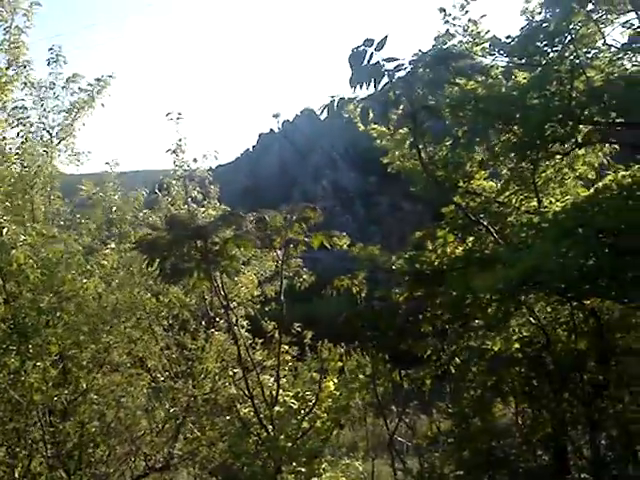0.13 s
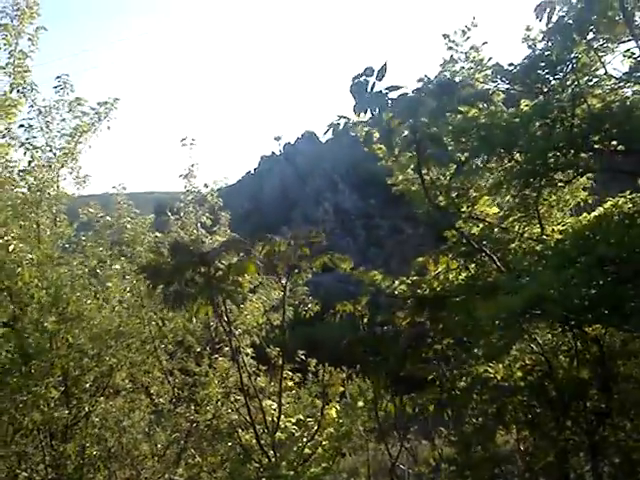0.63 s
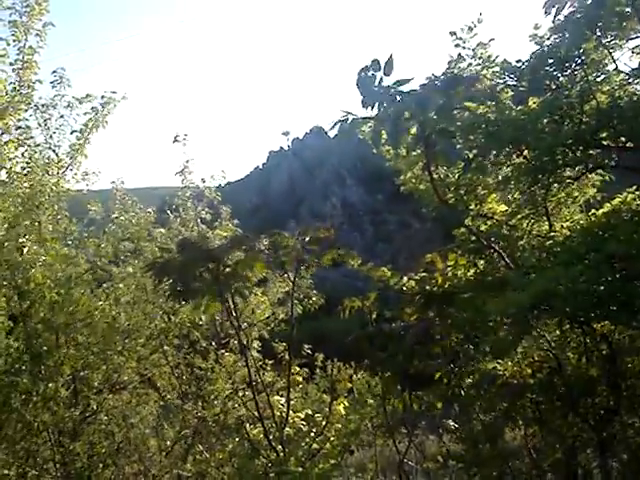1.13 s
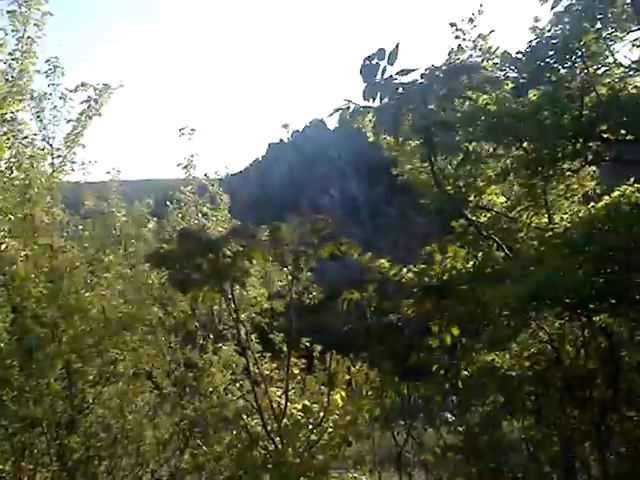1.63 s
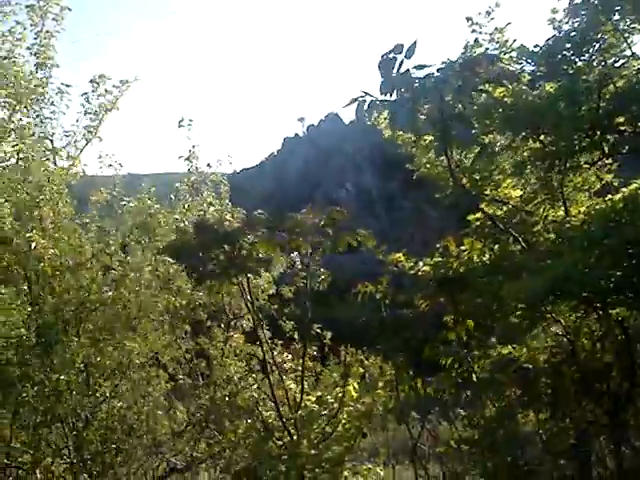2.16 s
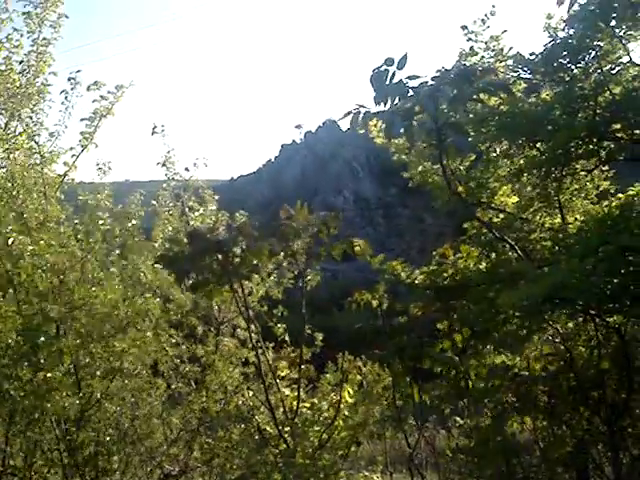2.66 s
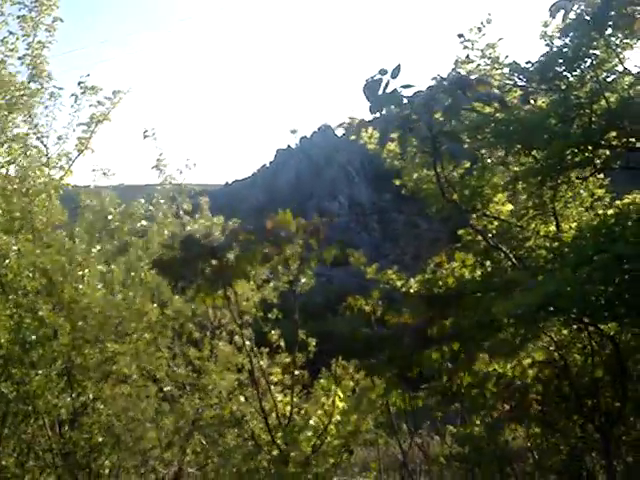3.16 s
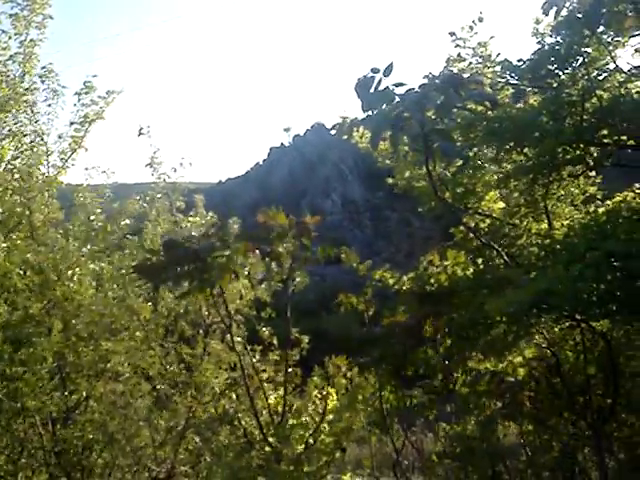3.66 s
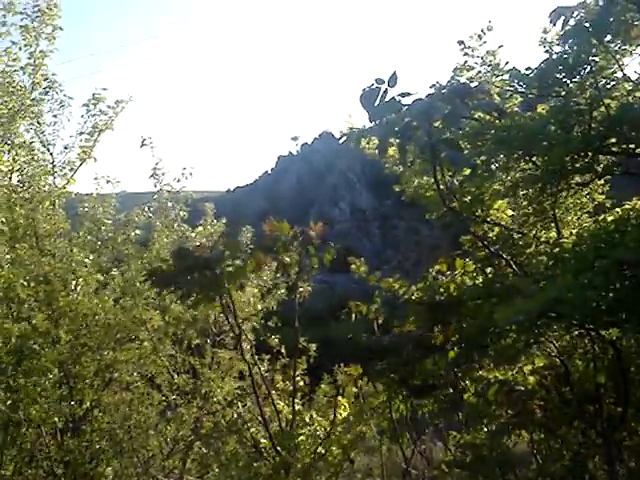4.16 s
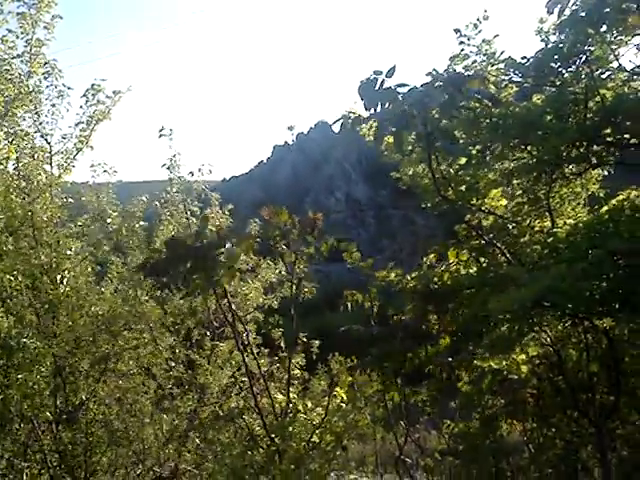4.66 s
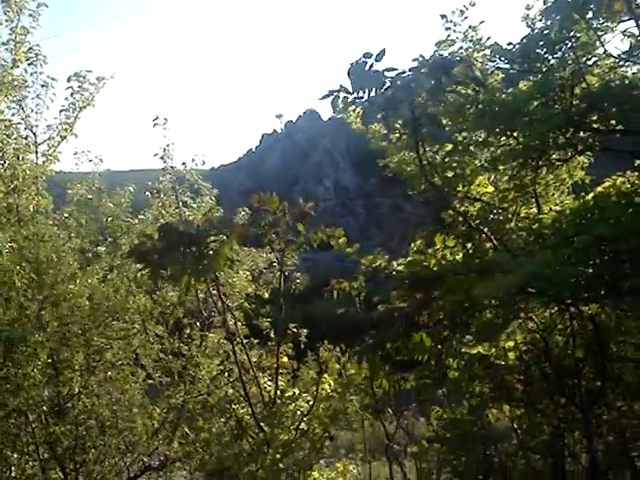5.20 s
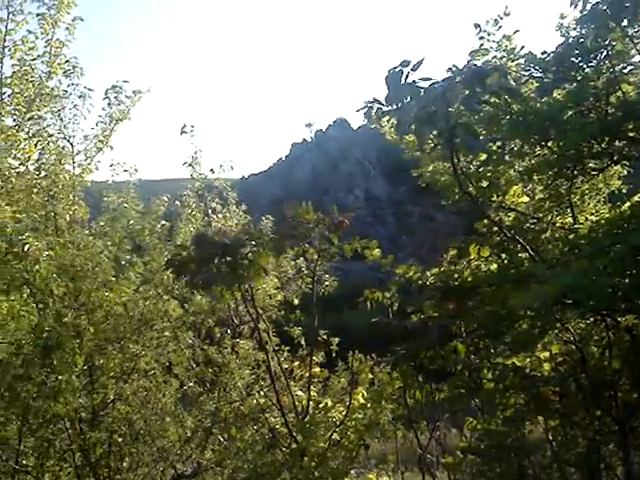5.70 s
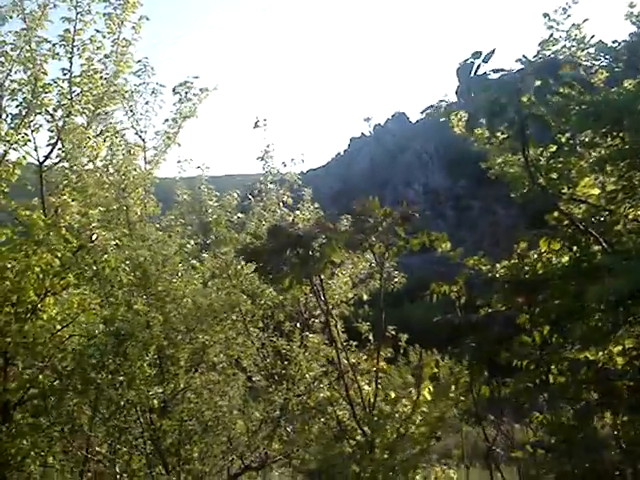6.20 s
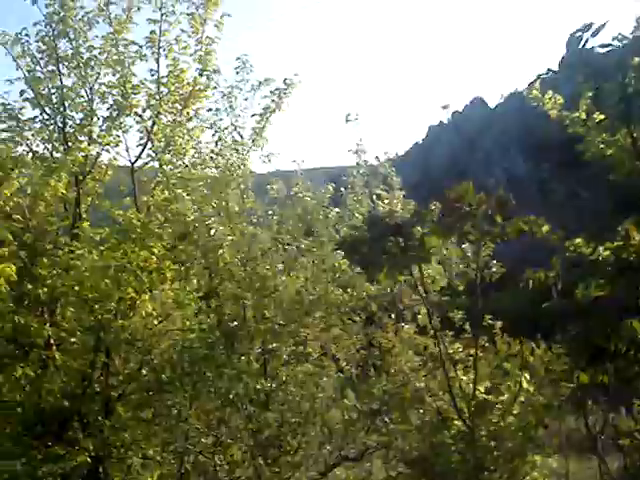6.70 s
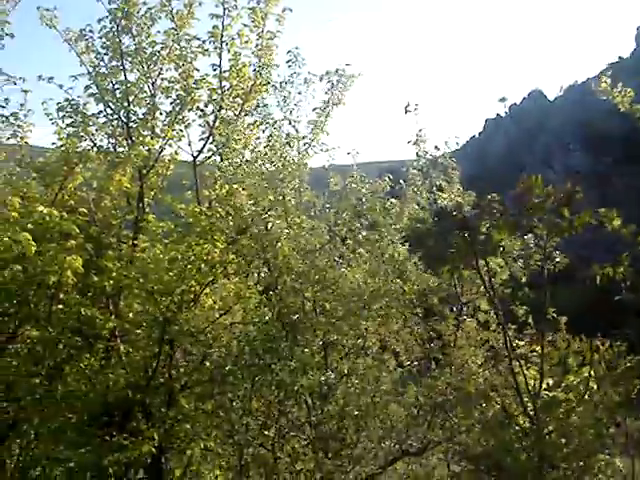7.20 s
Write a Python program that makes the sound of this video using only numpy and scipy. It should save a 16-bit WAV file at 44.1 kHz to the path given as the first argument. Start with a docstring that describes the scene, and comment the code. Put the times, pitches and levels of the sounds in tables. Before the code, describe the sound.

A quiet bushy valley, heard through one microphone with slightly dull treble and a faint airy hiss. Crickets chirp softly throughout in quick groups of four falling pulses near 4.5 kHz. At about 0.1, 0.4 and 0.7 s a near bird whistles a clear falling note, each preceded by a tiny high buzz; a lower dipping note follows at 0.9 and a fast hoarse downward trill at 1.1. From 1.2 to 4.3 s only faint distant whistles and twitters remain, blurred by echo, with dry close ticks at 2.1 and 2.3. More ticks come at 4.5, 5.0 and 6.3. Wind thumps softly at 3.7, then more densely from 4.2 to 5.8 and near 6.2. Short near peeps and slides sound at 4.8-5.2, a slower rising trill at 5.3-5.75, low chups at 5.9-6.2, then a quick bright jumble at 6.4-6.8, ending with faint far notes and crickets.

```python
"""Songbirds and crickets in a valley

Birds among bushes whistle in sines on bent pitch curves; trills and buzzes repeat one short sweep.
Crickets chirp in groups of four falling pulses, and dry ticks ring close to the microphone.
Echoes from leaves and slopes smear the notes, most of all the trills in the thicket, then the distant whistles.
Over faint shaped noise, later gusts thump on the single microphone as bursts of low swings."""
import sys
import numpy as np
from scipy import signal
from scipy.io import wavfile
from scipy.ndimage import uniform_filter1d

SR = 44100
rng = np.random.default_rng(int(sys.argv[2]) if len(sys.argv) > 2 else 0)


def wav_out(sig):
    """Save sig, one row per channel (or a flat mono array), as 16-bit PCM at SR to the path in sys.argv[1]."""
    wavfile.write(sys.argv[1], SR, np.round(np.clip(np.atleast_2d(sig).T, -1, 1) * 32767).astype(np.int16))


def gain_from_decibels(decibels):
    """Convert decibel values to linear amplitude factors."""
    exponent = np.asarray(decibels, float) / 20
    return 10 ** exponent


N = 323253  # samples


def evened(x):
    """Scales to rms 1."""
    return x / np.sqrt(np.mean(x ** 2) + 1e-20)


def add(mix, s, sound):
    """Mixes a sound in from time s."""
    part = mix[max(round(s * SR), 0):][:len(sound)]
    part += sound[:len(part)]


def sweep(hz, level, octave=0):
    """A sine that follows a pitch curve, with a share of its octave."""
    phase = 2 * np.pi * np.cumsum(hz) / SR
    return level * (np.sin(phase) + octave * np.sin(2 * phase))


def flutter(n, size):
    """Random wavering of rms 1, smooth over size samples."""
    smooth = uniform_filter1d(rng.standard_normal(n), size)
    return evened(uniform_filter1d(smooth, size))


def noise(points, patchy_db):
    """Random short-time spectra of a given colour, with drifting patches; rms 1."""
    hz = np.fft.rfftfreq(2048, 1 / SR)
    real, imag, patches = rng.standard_normal((N // 512 + 5, len(hz), 3)).T
    patches = uniform_filter1d(patches, size=5, axis=1)  # over time
    patches = evened(uniform_filter1d(patches, size=20, axis=0))  # over frequency
    point_hz, point_db = np.transpose(points)
    colour_db = np.interp(np.log(hz + 1), np.log(point_hz + 1), point_db)[:, None]
    spectra = (real + 1j * imag) * gain_from_decibels(colour_db + patchy_db * patches)
    return evened(signal.istft(spectra, nperseg=2048, noverlap=1536)[1][:N])


# colour of the air around the microphone: (frequency [Hz], relative density [dB per Hz])
AIR_COLOUR = [(35, -43), (60, -17), (175, -3.5), (466, -4.5), (1250, -11), (3620, -15.5), (4580, -15),
              (10500, -27)]


def air():
    """The faint bed of the place: noise strongest in the low mids, a little patchy."""
    return gain_from_decibels(-52) * noise(AIR_COLOUR, patchy_db=1.4)  # rms in dB


# eddies that hit the microphone: (time of the middle [s], swing rate [Hz], envelope peak [dB])
EDDIES = [(3.661, 154, -26.5), (4.217, 77, -31.5), (4.391, 97, -32), (4.538, 94.5, -33), (4.902, 191, -24),
          (5.082, 75, -31), (5.212, 119, -27), (5.241, 92, -26), (5.272, 132, -24), (5.299, 139, -21.5),
          (5.517, 86.6, -31.5), (5.625, 111, -25.5), (5.641, 76.4, -26), (5.766, 92, -26),
          (6.141, 153, -30), (6.258, 125, -31)]
# rumble at the microphone between the gusts: (time [s], rms level [dB])
WIND_LEVEL = [(0, -69), (2.4, -69.5), (3.5, -61.5), (4.3, -44), (6, -46), (6.7, -51.5), (7.33, -48.5)]
# colour of that rumble: (frequency [Hz], relative density [dB per Hz])
RUMBLE_COLOUR = [(15, -12), (70, -0.5), (150, -11.5), (600, -56.5)]


def wind():
    """Single eddies push the membrane for a cycle or two; a lumpy rumble swells around them."""
    out, gusts = np.zeros(N), np.zeros(N)
    for (s, hz, db), phase in zip(EDDIES, rng.random(len(EDDIES))):
        cycle = np.arange(-2, 2, hz / SR)
        bent = cycle + 0.082 * np.sin(2 * np.pi * cycle)  # uneven swings put some power higher up
        envelope = gain_from_decibels(db) * np.exp(-(cycle / 0.73) ** 2)
        add(out, s - 2 / hz, envelope * np.cos(2 * np.pi * (bent + phase)))
        add(gusts, s - .06, gain_from_decibels(db - 21) * np.hanning(round(.15 * SR)))
    s, db = np.transpose(WIND_LEVEL)
    between = gain_from_decibels(np.interp(np.arange(N) / SR, s, db))
    return out + noise(RUMBLE_COLOUR, patchy_db=3.5) * (gusts + between)


# dry ticks close to the microphone: (time [s], level before crackle and ring shape it [dB])
TICK_TIMES = [(2.0604, -36.5), (2.312, -37.5), (4.5318, -34.5), (5.012, -38.5), (6.326, -40)]
# ringing of a tick: (frequency [Hz], relative level [dB], time to fall by 60 dB [s])
TICK_MODES = [(1484, -4.5, 0.023), (3800, 3, 0.0084), (6550, 5.5, 0.0015), (8700, -1, .0015)]


def ticks():
    """A ragged crackle of two milliseconds that rings for a few milliseconds."""
    out, t = np.zeros(N), np.arange(1000) / SR
    ring = sum(gain_from_decibels(db - 60 * t / t60) * np.sin(2 * np.pi * hz * t) for hz, db, t60 in TICK_MODES)
    crackles = rng.standard_normal((len(TICK_TIMES), 100)) ** 3  # the cube makes it ragged
    for (s, db), crackle in zip(TICK_TIMES, crackles):
        crackle = crackle * np.hanning(len(crackle) * 2)[len(crackle):]  # fades out
        add(out, s, gain_from_decibels(db) * np.convolve(crackle / np.linalg.norm(crackle), ring))
    return out


# chirps of the clearer crickets: (middle of the first pulse [s])
CHIRP_TIMES = [0.019, 0.28, .391, 0.723, 1.169, 1.562, 1.723, 2.003, 2.182, 2.472, 2.985, 3.367, 3.431,
               3.846, 3.963, 4.264, 4.727, 4.939, 5.105, 5.232, 5.399, 5.842, 6.167, 6.713, 7.279]
# wing strokes of one chirp: (time after the first [s])
WING_STROKES = [0, .042, .086, .132]


def crickets():
    """Each wing stroke is a tone that falls as the file runs out; fainter crickets chirp at random times."""
    out, u = np.zeros(N), np.linspace(0, 1, round(0.03 * SR))
    slots = zip(np.arange(0, N / SR, .2), rng.random((60, 2)))
    faint = [(s + .12 * late, -66 + 5 * louder) for s, (late, louder) in slots]
    chirps = faint + [(s, -52) for s in CHIRP_TIMES]  # typical stroke peak in dB
    chance = rng.standard_normal((len(chirps), len(WING_STROKES), 2))
    for (s, db), draws in zip(chirps, chance):
        for later, (own_level, own_pitch) in zip(WING_STROKES, draws):
            hz = (4830 - 520 * u ** 1.8) * (1 + .005 * own_pitch)
            level = np.sin(np.pi * u) * gain_from_decibels(db + 1.5 * own_level)
            add(out, s + later - len(u) / SR / 2, sweep(hz, level))
    return out


def whistle(s, hz, db, edge, octave=0):
    """A pure tone on a rounded pitch curve, with soft edges of the given seconds and a share of octave."""
    t = np.arange(s[0], s[-1], 1 / SR)
    hz = uniform_filter1d(np.interp(t, s, hz), size=220, mode="nearest")
    db = uniform_filter1d(np.interp(t, s, db), size=90, mode="nearest")
    to_edge = np.minimum(t - s[0], s[-1] - t)
    edges = np.sin(np.pi / 2 * np.clip(to_edge / edge, 0, 1)) ** 2
    return sweep(hz, edges * gain_from_decibels(db), octave)


# whistled notes, by name: (share of the length, share of the way from low to high pitch, level [dB])
NOTE_SHAPES = { "tew": [(0, 0.99, -13.5), (.27, .86, -9.5), (.31, .81, -1), (.52, .42, -3),
               (.75, 0.125, -6.5), (1, 0.0043, -16.5)], "slide": [(0, 0.93, -7), (.45, .52, -1),
               (1, 0, -5)], "hook": [(0, 0.057, -10), (.27, 0.87, -2.5), (1, .15, -7)],
               "chup": [(0, 0.44, 0.5), (.32, .6, -11), (.53, 0.94, -1.5), (.7, 0.521, -10), (1, 0, -2)],
               "dip": [(0, 1, -5), (.25, 0, -22), (.53, 0.65, -18), (.77, .75, -3), (1, 0.66, -12)],
               "scoop": [(0, 0.55, 8.5), (.21, 0.039, -22.5), (.64, .69, -6.5), (1, 0.98, -13)],
               "spike": [(0, 0, -23), (.49, .42, -13), (.77, 1, -7), (1, 0.112, 6)], "fall": [(0, 0.97, 8),
               (1, 0.078, 3.5)], "rise": [(0, 0.097, 1), (.45, .45, -1), (1, 1, -2.5)], "drop": [(0, 1, 7),
               (.4, .15, 3.5), (1, 0, -1.5)], "leap": [(0, 0, 1.5), (.38, 1, 5), (1, 0.82, -3)],
               "arch": [(0, 0, 2), (.38, 0.97, 1), (.6, .9, 3), (1, 0.42, 0)], }
NOTE_SHAPES["reedy"] = NOTE_SHAPES["arch"]  # one bird arches its notes with a strong octave on top
# octave on top of a note, by shape: (share of the fundamental's amplitude)
OCTAVE_SHARE = {"reedy": 0.55}


def song(table, edge):
    """Each note stretches its shape over its length and pitch range."""
    out = np.zeros(N)
    for shape, rows in table.items():
        when, height, own_db = np.transpose(NOTE_SHAPES[shape])
        octave = OCTAVE_SHARE.get(shape, 0)
        for start, length, low_hz, high_hz, db in rows:
            hz = low_hz + (high_hz - low_hz) * height
            add(out, start, whistle(length * when, hz, db + own_db, edge, octave))
    return out


# birds further off, by shape of note:
# (start [s], length [s], low pitch [Hz], high pitch [Hz], level before the shape's own [dB])
FAR_NOTES = { "fall": [(.328, 0.019, 3380, 4240, -52), (.605, 0.065, 2970, 3510, -57.5),
             (1.98, 0.016, 2100, 2950, -58), (2.6, 0.0412, 3170, 3650, -58), (3.66, 0.035, 4000, 4580, -58),
             (4.393, 0.025, 3715, 3940, -54), (5.712, 0.023, 2600, 3000, -49),
             (6.262, 0.019, 3880, 4500, -55), (7.048, 0.02, 4270, 4420, -57)],
             "rise": [(.235, .075, 2540, 4400, -52), (6.955, 0.052, 2620, 3000, -63),
             (3.81, 0.015, 2670, 3320, -41.5), (4.735, 0.032, 5160, 5930, -50.5),
             (5.18, 0.02, 2660, 3150, -46.5), (6.905, 0.076, 3500, 4300, -56.5)],
             "drop": [(1.522, 0.021, 2740, 3510, -55), (2.835, 0.064, 2016, 2910, -59.5),
             (1.812, 0.023, 3100, 4820, -55), (3.495, 0.011, 3990, 4500, -53),
             (3.518, 0.021, 3360, 3860, -47.5), (3.548, 0.021, 3340, 3820, -52),
             (3.765, 0.024, 3820, 4590, -46.5), (4.2, 0.03, 3600, 4600, -49.5),
             (4.238, 0.055, 3325, 3570, -53), (4.518, .024, 3565, 4580, -51.5),
             (4.548, 0.059, 3210, 3600, -54.5), (5.66, 0.061, 3310, 4220, -52.5),
             (7.065, 0.13, 2815, 3020, -57.5)], "leap": [(.685, 0.02, 3480, 3730, -53),
             (1.538, 0.061, 3200, 3550, -57), (1.95, 0.025, 2700, 2970, -58),
             (3.735, 0.018, 3780, 4170, -57), (3.9, 0.053, 2770, 3920, -54),
             (6.185, 0.044, 4950, 7030, -54.5), (6.255, 0.065, 4190, 6700, -56.5)],
             "arch": [(2.7, 0.061, 4090, 4690, -53), (2.705, 0.049, 3300, 3800, -60.5),
             (3.625, 0.055, 2870, 3900, -52), (3.893, .072, 3450, 4700, -52),
             (6.155, 0.032, 4060, 5800, -53.5), (6.9, 0.08, 4220, 5990, -60.5)],
             "reedy": [(1.2, 0.14, 3000, 3320, -61), (1.377, 0.033, 2780, 3480, -61),
             (1.835, 0.12, 3000, 3370, -59.5), (2.003, 0.044, 3100, 3640, -60),
             (1.3, 0.045, 2300, 3700, -60.5)], }


def far_whistles():
    """Distant birds, and short twitters at random behind them; moving air and leaves make their level waver."""
    out = song(FAR_NOTES, edge=.005)
    for s, pitch, bend, fall in rng.random((45, 4)):
        hz = (1900 + 2300 * pitch) * np.array([1, .9 + .3 * bend, 1.1 - .35 * fall])
        add(out, s * N / SR, whistle([0, .015, .04], hz, [-61] * 3, edge=.006))
    return out * gain_from_decibels(3 * flutter(N, size=150))


# trills and buzzes in the thicket, before fade, sag and scatter:
# (start [s], end [s], sweeps per second [1/s], from [Hz], to [Hz], level [dB])
TRILL_RUNS = [(0.005, 0.088, 180, 7570, 6750, -50.5), (0.331, 0.417, 250, 7260, 6540, -51),
              (0.634, 0.675, 140, 8120, 6750, -45), (1.054, 1.2, 79, 5900, 3600, -36.5),
              (4.324, 4.371, 39, 5040, 6350, -46), (4.645, 4.669, 42, 6420, 4760, -42),
              (6.953, 7.001, 120, 5940, 5150, -46.5), (5.346, 5.65, 28.3, 4100, 8200, -45.5),
              (5.664, 5.76, 24.6, 4100, 8200, -43.5), (6.416, 6.434, 140, 5650, 4140, -37.5),
              (6.489, 6.511, 200, 3920, 3040, -36), (6.653, 6.707, 150, 4600, 4110, -32),
              (6.753, 6.765, 230, 6520, 3140, -33)]


def trills():
    """One short hoarse sweep repeated, each a little different; a fast trill starts softly;
    each fades and sags in pitch."""
    out = np.zeros(N)
    for start, end, rate, from_hz, to_hz, db in TRILL_RUNS:
        chance = rng.standard_normal((30, 3)) * [1.6, .0008, .02]  # dB, s, share of the pitch
        length = min(.003 + .4 / rate, .011)  # s
        u = np.linspace(0, 1, round(length * SR)) ** .6  # quick at first
        for s, (own_db, late, off_pitch) in zip(np.arange(start, end, 1 / rate), chance):
            done = (s - start) / (end - start)
            soft_start = 13 * (s == start and rate > 60)  # dB
            level = np.sin(np.pi * u) ** 1.3 * gain_from_decibels(db - 8 * done - soft_start + own_db)
            hz = (from_hz + (to_hz - from_hz) * u) * (1 + off_pitch - .05 * done)
            lower_octave = sweep(hz / 2, .22 * level)
            add(out, s + late, sweep(hz, level) + lower_octave)
    return out * (1 + .5 * flutter(N, size=30))  # hoarseness


# the birds nearer the microphone, by shape of note:
# (start [s], length [s], low pitch [Hz], high pitch [Hz], level before the shape's own [dB])
NEAR_NOTES = { "tew": [(.116, 0.11, 1844, 3233, -25), (.421, 0.1, 2003, 3163, -23),
              (.726, 0.11, 1985, 3166, -24)], "dip": [(.931, .077, 1086, 2201, -28.5)],
              "hook": [(4.775, 0.0466, 3710, 4350, -35.5), (5.098, 0.041, 3510, 4130, -36.5)],
              "slide": [(4.886, .064, 2180, 2553, -30), (5.186, .066, 2218, 2572, -28.5)],
              "chup": [(5.862, 0.034, 1396, 2370, -29.5), (6.042, 0.027, 1307, 2550, -25.5),
              (6.232, .032, 1260, 2567, -27.5)], "spike": [(6.423, .035, 2075, 4550, -26.5)],
              "rise": [(5.055, 0.024, 5100, 5596, -37.5), (6.472, 0.022, 2830, 3820, -31)],
              "scoop": [(6.553, .042, 1450, 2900, -21.5)], }


def whistles():
    """The nearer birds: clear whistles, sines on bent pitch curves."""
    return song(NEAR_NOTES, edge=.007)


def slopes(x, leaves_db, valley_db):
    """Scattering by leaves, then a longer, fainter echo from the valley sides."""
    t = np.arange(SR * 3 // 4) / SR
    taps = rng.standard_normal(len(t)) * np.clip(t / .008, 0, 1)  # builds up over 8 ms
    leaves, valley = gain_from_decibels(-60 * t / 0.22), gain_from_decibels(-60 * t / 1.03)  # each falls by 60 dB in so many s
    leaves = gain_from_decibels(leaves_db) * leaves / np.linalg.norm(leaves)
    valley = gain_from_decibels(valley_db) * valley / np.linalg.norm(valley)
    return x + signal.fftconvolve(x, taps * (leaves + valley))[:N]


def scene():
    """Thicket trills carry the most echo, far whistles less, near whistles and crickets the least;
    one microphone feeds both channels."""
    far = slopes(far_whistles(), leaves_db=-2.5, valley_db=-16)
    thicket = slopes(trills(), leaves_db=-1.5, valley_db=-11.5)
    near = slopes(whistles() + crickets(), leaves_db=-8.0, valley_db=-15)
    mix = air() + wind() + ticks() + far + thicket + near
    return np.array([mix, mix])


def top_cut(x):
    """Nothing passes above the cut-off."""
    return signal.sosfilt(signal.butter(12, 10040, fs=SR, output="sos"), x)


def record(dry):
    """A steep low-pass takes away the highest treble of the microphone signal."""
    low_pass = signal.firwin(1023, 10120, window=("kaiser", 10), fs=SR)  # edge in Hz
    limited = signal.oaconvolve(dry, low_pass[None], "same")
    return top_cut(limited)


dry = scene()
out = record(dry)
wav_out(out)
```